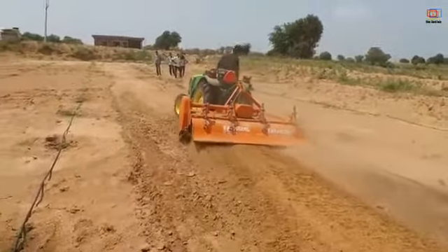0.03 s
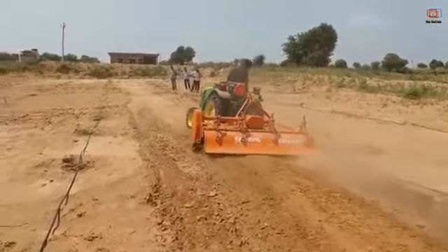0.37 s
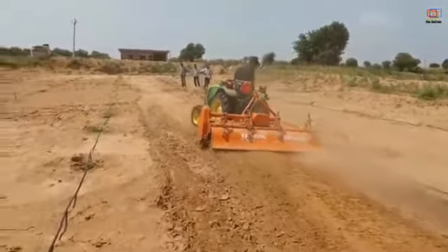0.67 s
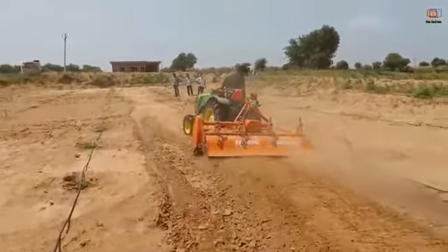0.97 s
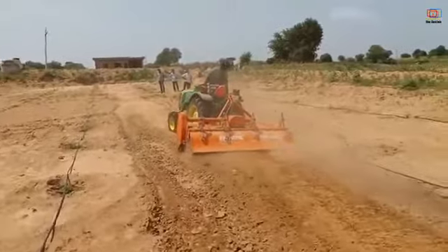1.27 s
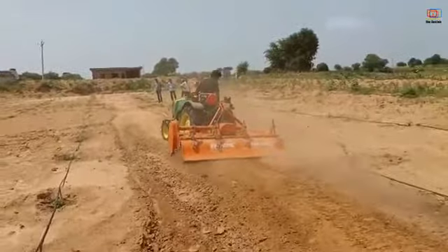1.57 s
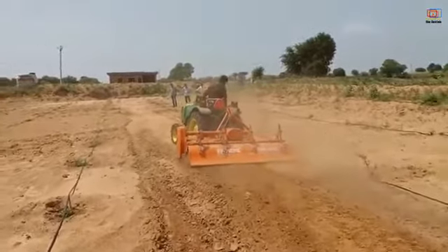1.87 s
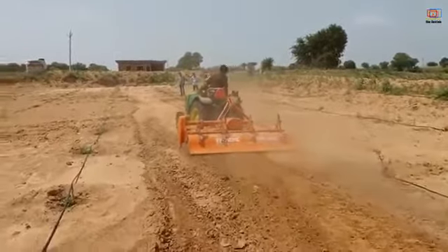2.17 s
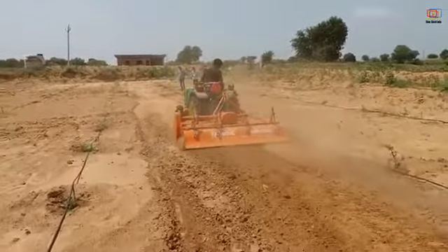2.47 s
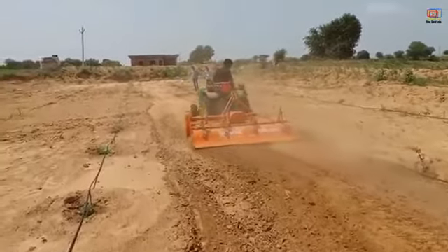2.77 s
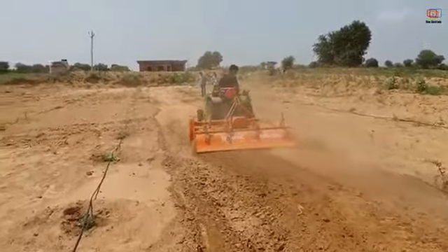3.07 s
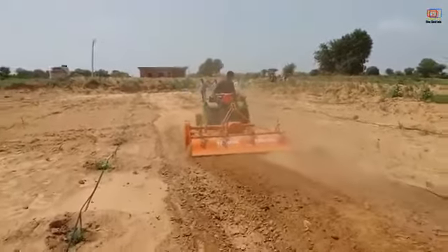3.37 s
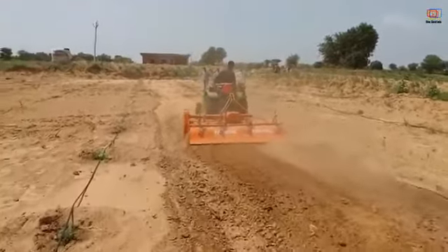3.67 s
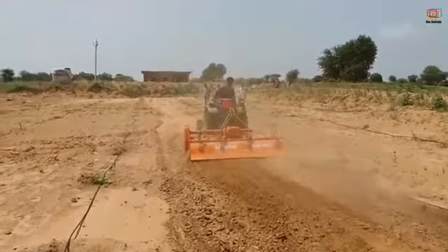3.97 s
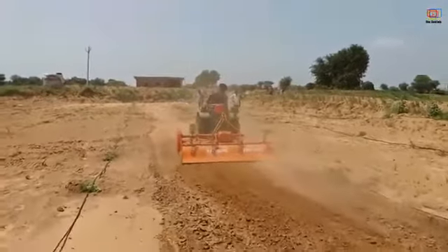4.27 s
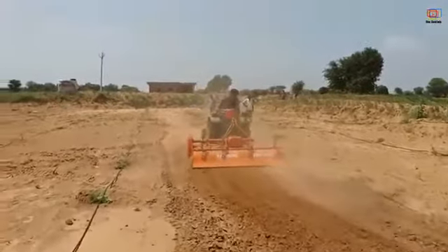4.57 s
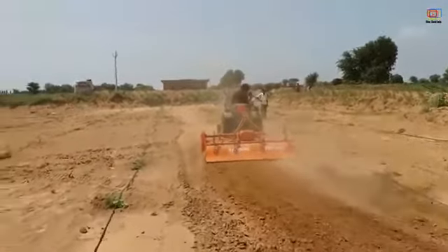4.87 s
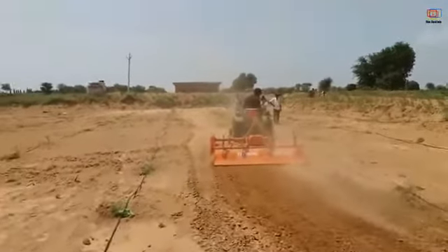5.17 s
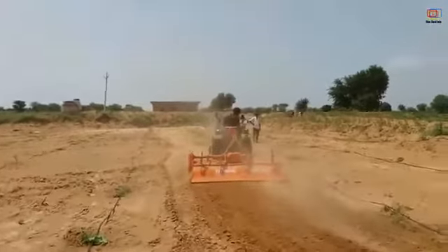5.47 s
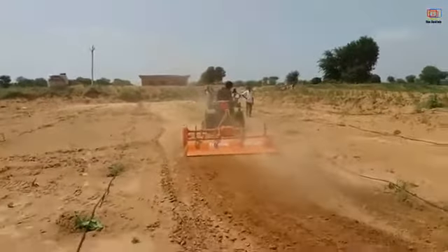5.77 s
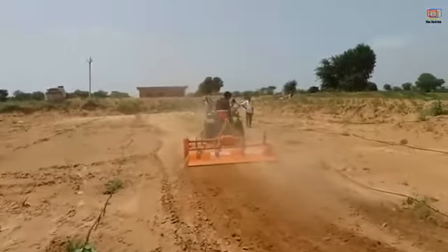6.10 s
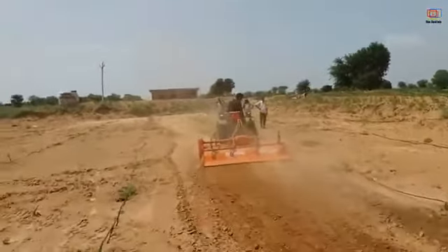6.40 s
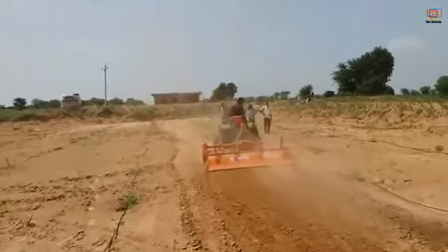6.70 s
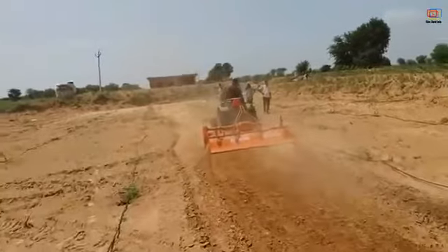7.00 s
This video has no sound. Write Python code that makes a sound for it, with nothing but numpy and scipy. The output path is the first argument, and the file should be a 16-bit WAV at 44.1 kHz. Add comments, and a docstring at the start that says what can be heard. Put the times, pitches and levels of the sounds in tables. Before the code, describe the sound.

Out in an open field, a small diesel tractor chugs evenly under load, its casings rattling and a loose metal cover clanking rapidly. The tiller behind it throws a gritty spray of dry earth, with a few small knocks from clods and stones. Two short grinding patches come early, the second with a harder growl and louder clanking. The hiss then softens as the machine moves slowly away, and light wind rumbles faintly on the stereo microphone.

```python
"""A small three-cylinder diesel tractor draws a rotary tiller away across a dry field, held near one
speed by its governor. The exhaust drones and gears whine; every firing knocks the block, rattles the
casings and rings a loose steel cover. The blades throw soil, sand and clods against the tiller's hood
and grind through two hard patches. It is heard in a light breeze, through two microphone ports a hand
apart. One engine cycle holds three firings; a tone's order is its multiple of the cycle rate."""
import sys
import numpy as np
from scipy import signal
from scipy.fft import rfft, irfft
from scipy.io import wavfile
from scipy.ndimage import uniform_filter1d

SR = 44100
rng = np.random.default_rng(int(sys.argv[2]) if len(sys.argv) > 2 else 0)


def store_wav(level_fs):
    """Save 16-bit WAV to argv[1]."""
    pcm = np.round(np.clip(np.atleast_2d(level_fs), -1, 1) * 32767)
    wavfile.write(sys.argv[1], SR, pcm.T.astype(np.int16))


N = 319284
TIME = np.arange(N) / SR
FREQ = np.fft.rfftfreq(N, 1 / SR)
FROM_MIDDLE_S = TIME - TIME.mean()
FIRST_FIRING = 0.05586  # place in the cycle, 0-1

# Engine speed. Each row: time in seconds, firings per second.
FIRING_RATE = [(0, 64.49), (0.8, 64.43), (1.35, 64.76), (2.0, 63.94), (2.4, 64.33), (2.8, 64.26),
               (3.2, 64.75), (3.7, 64.27), (4.7, 64.26), (5.4, 64.46), (6.5, 64.31), (7.24, 63.82)]
# The block's knock. Each row: time in seconds, relative level in dB.
KNOCK_LEVEL = [(0.05, -23), (0.32, -26), (0.58, -22), (1.72, -27.5), (2.56, -27), (3.03, -27),
               (5.53, -26.5), (7.1, -25.5)]
# The treble of valves and soil. Each row: time in seconds, relative level in dB.
TREBLE_LEVEL = [(0, -23.5), (0.7, -21), (1.1, -23.5), (2.0, -22), (2.75, -22.5), (3.1, -24.5),
                (3.85, -23.5), (4.95, -22.5), (5.3, -24), (7.24, -27)]


def undb(db):
    """Decibels to gain."""
    return 10 ** (np.asarray(db) / 20)


def unit(x):
    """Scale to rms 1."""
    return x / np.sqrt(np.mean(x ** 2))


def curves(table):
    """The columns of a timed table at every sample."""
    times, *columns = np.transpose(table)
    return [np.interp(TIME, times, column) for column in columns]


def response(points):
    """Gain at every frequency from (Hz, dB) points."""
    hz, db = np.transpose(points)
    return undb(np.interp(np.log(FREQ + 1), np.log(hz), db))


def colour(x, points):
    """EQ by (Hz, dB) points, rolling off beyond both ends; rms 1."""
    low_cut = 1 / (1 + (points[0][0] / (FREQ + 1)) ** 4)
    high_cut = 1 / (1 + (FREQ / points[-1][0]) ** 4) ** .5
    return unit(irfft(rfft(x) * response(points) * low_cut * high_cut, N))


def walk(rate):
    """Random drift: levels held 1 / rate seconds and smoothed twice; rms 1."""
    hold = int(SR / rate)
    held = np.repeat(rng.standard_normal(N // hold + 1), hold)
    return unit(uniform_filter1d(uniform_filter1d(held, hold), hold)[:N])


def spell(start, end, ramp_s):
    """A gate from 0 to 1 and back, with straight ramps centred on start and end."""
    return np.clip(np.minimum(TIME - start, end - TIME) / ramp_s + .5, 0, 1)


def driven(db, follow, fade_db_per_s):
    """A part's gain: it follows the load and fades as the tractor recedes (a negative fade swells)."""
    # How hard the load shakes the machine. Each row: time in seconds, relative level in dB.
    effort = [(0, -25), (0.17, -21.5), (0.32, -23.5), (0.5, -22.5), (0.9, -25.5), (1.08, -27.5),
              (1.65, -25.5), (2.05, -22), (2.35, -22.5), (2.6, -21.5), (3.0, -23), (3.7, -22.5),
              (4.15, -21.5), (4.4, -25), (4.61, -29), (4.75, -26), (4.95, -24), (5.3, -29), (6.28, -28.5),
              (6.4, -33), (6.52, -28), (7.24, -27.5)]
    above_usual_db = curves(effort)[0] + 23.5
    return undb(db + follow * above_usual_db - fade_db_per_s * FROM_MIDDLE_S)


def clearness():
    """A slowly rising gain that favours tones over clatter as the tractor recedes."""
    return undb((-3 + 0.66 * TIME) / 2)


def tones(cycle, table, waver_db, wander_rad, start_turns=lambda order: rng.random()):
    """Sines locked to the crank from (order, dB) rows, wavering in level and phase; 0 dB is rms 1."""
    out = 0
    for order, db in table:
        phase = 2 * np.pi * (order * cycle + start_turns(order)) + wander_rad * walk(5)
        out = out + np.sqrt(2) * np.sin(phase) * undb(db + waver_db * walk(5))
    return out


def blows(cycle, cylinder_db, decay, rise, steady):
    """Envelope of three evenly spaced firings over a steady churn; decay and rise are in cycles."""
    total = steady
    for k, db in enumerate(cylinder_db):
        age = (cycle - FIRST_FIRING - k / len(cylinder_db)) % 1
        total = total + undb(db) * np.exp(-age / decay) * (1 - np.exp(-age / rise))
    return total


def clatter(cycle, cylinder_db, repeat, decay, rise, steady, bite_db=1.5):
    """Metal clatter: a share of the contacts repeats every cycle, slowly shifting; the rest is new."""
    size, count = 2048, 3  # points in a cycle's contact pattern, patterns to crossfade
    turn = np.arange(size) / size
    weights = np.array([walk(1.188) for _ in range(count)])
    weights = weights / np.sqrt(np.sum(weights ** 2, axis=0))
    patterns = irfft(np.exp(2j * np.pi * rng.random((count, size // 2 + 1))))
    repeating = sum(w * np.interp(cycle % 1, turn, unit(p)) for w, p in zip(weights, patterns))
    share = np.clip(repeat + .05 * FROM_MIDDLE_S, 0, 1)  # more regular as the work settles
    contacts = np.sqrt(share) * repeating + np.sqrt(1 - share) * rng.standard_normal(N)
    load = undb(bite_db * walk(16))  # the blades bite unevenly
    return contacts * load * blows(cycle, cylinder_db, decay, rise, steady)


def exhaust(cycle):
    """The muffled pipe drones on the first three harmonics of the firing rate."""
    # Each row: time in seconds, then relative levels of harmonics one, two and three in dB.
    drone = [(0, -33, -34, -38), (0.8, -32.5, -33.5, -31), (1.5, -32.5, -36, -30), (2.0, -33.5, -47, -28.5),
             (2.5, -28.5, -49.1, -32.5), (3.3, -31, -46, -32.5), (4.2, -30, -41.5, -30),
             (5.5, -29, -36, -29.5), (7.24, -28.5, -34, -27.5)]
    harmonics = [(3 * (k + 1), db) for k, db in enumerate(curves(drone))]
    return tones(cycle, harmonics, waver_db=1.46, wander_rad=0.056) * undb(-0.8)


def engine(cycle):
    """Firings shake the chassis, knock the block and rattle the casings."""
    # EQ of each part, and of the casings' ring. Each row: frequency in Hz, gain in dB.
    chassis_eq = [(20, -17), (45, -9), (100, -10.5), (160, -2), (230, -2), (330, -0.5), (430, -4),
                  (540, -1), (700, -17)]
    block_eq = [(400, -30), (540, -2.5), (640, 1), (760, 3), (830, 1.5), (920, -2), (1200, -61)]
    casing_eq = [(700, 1.5), (900, -3), (1050, 0), (1200, -2), (1400, 1), (1650, -1), (1950, -0.5),
                 (2300, -1), (2900, -14.5)]
    ring_eq = [(700, -13), (840, 1), (930, -1), (1060, -19), (1500, -29)]
    shake = clatter(cycle, (0, 0, -2), repeat=0.28, decay=0.17, rise=0.044, steady=0.4)
    knock = clatter(cycle, (0, -2, -4), repeat=0.22, decay=0.14, rise=0.059, steady=0.32)
    contacts = clatter(cycle, (-2, 0, -4), repeat=0.6, decay=0.04, rise=0.055, steady=0.57)
    chassis = colour(shake, chassis_eq) * driven(db=-31.0, follow=0.29, fade_db_per_s=-0.33)
    block = colour(knock, block_eq) * undb(curves(KNOCK_LEVEL)[0] - 5.0)
    ring = colour(contacts, ring_eq) * driven(db=-15.5, follow=1.6, fade_db_per_s=0.6)
    casing = colour(contacts, casing_eq) * undb(3.5) + ring
    return (chassis + block) / clearness() + casing * driven(db=-29.0, follow=0.81, fade_db_per_s=0.54)


def gears(cycle):
    """Loaded gears and shafts whine at fixed ratios to the crank."""
    # The gear tones. Each row: order, relative level in dB.
    gear_tones = [(13.92, -1.5), (25.67, 1.7), (35.22, -1.5), (47.9, -9), (51.34, -7), (68.97, -4)]
    # Their shared fader. Each row: time in seconds, gain in dB.
    whine_level = [(0, -34.5), (0.42, -38), (1.2, -34.5), (1.5, -43.5), (2.2, -33.5), (2.6, -51),
                   (3.3, -38), (3.75, -31), (4.01, -33.5), (4.68, -32), (5.4, -36), (5.6, -33.5),
                   (7.24, -35.5)]
    return tones(cycle, gear_tones, waver_db=1.9, wander_rad=0.45) * undb(curves(whine_level)[0])


def chug_phase(order):
    """The phase in turns that the firings give a tone, so that neighbouring tones add up to a chug."""
    delay = 0.0902  # cycles after each firing
    pushes = sum(undb(db) * np.exp(-2j * np.pi * order * (FIRST_FIRING + delay + k / 3))
                 for k, db in enumerate((0, -1, -7)))
    return np.angle(pushes) / (2 * np.pi) + 0.12 * rng.standard_normal()


def hum(cycle):
    """Chassis, block, cover and frame sing with the crank; a growl swells as the engine labours."""
    # The tones of each part. Each row: order, relative level in dB.
    chassis_tones = [(7, -13), (8, -17), (11, -18), (12, -9.5), (13, -14), (25, -16)]
    block_tones = [(29, -16), (30, -12), (31, -15), (32, -11.5), (33, -17), (34, -14), (35, -12.5),
                   (36, -14.5), (37, -12), (38, -11)]
    cover_tones = [(63, -6), (68, -10), (70, -7), (72, -4), (75, -7), (78, 0), (81, -7)]
    frame_tones = [(16, -18), (17, -12), (18, -15), (19, -16), (20, -20)]
    # Faders for cover and frame. Each row: time in seconds, gain in dB.
    cover_level = [(0, -31.5), (1.3, -32.5), (1.8, -37), (3.3, -39), (4.5, -39), (5.7, -38.5), (7.24, -41)]
    frame_level = [(0, -39), (0.6, -27), (5.3, -32), (6.0, -38.5), (7.24, -38)]
    labour = spell(1.7, 3.16, ramp_s=0.99)  # a stretch of harder soil
    growl_db = -3.5 + 6.5 * labour - 2.5 * TIME
    chassis = tones(cycle, chassis_tones, waver_db=1.5, wander_rad=0.35) * undb(-4.0) * clearness()
    growl = tones(cycle, [(15, growl_db)], waver_db=2.2, wander_rad=.6)  # fifth firing harmonic
    block = tones(cycle, block_tones, waver_db=2.5, wander_rad=0.31, start_turns=chug_phase)
    block *= undb(curves(KNOCK_LEVEL)[0] - 1.1) * clearness()
    cover = tones(cycle, cover_tones, waver_db=2.0, wander_rad=0.51) * undb(curves(cover_level)[0])
    frame = tones(cycle, frame_tones, waver_db=1.5, wander_rad=0.46) * undb(curves(frame_level)[0])
    return (chassis + growl) * driven(db=-30.0, follow=0.39, fade_db_per_s=-1.45) + frame + block + cover


def valves(cycle):
    """Injectors and valves tick brightly at every firing."""
    # EQ of the ticks. Each row: frequency in Hz, gain in dB.
    tick_eq = [(1400, -2), (2000, 3.5), (2500, -3), (2950, 8.5), (3600, 5.5), (4300, 0), (4900, 2.5),
               (5500, -9), (6000, 1), (7000, -28), (8000, -30), (14000, -48)]
    early = cycle + 0.02505
    ticks = clatter(early, (0, -2.5, -.5), repeat=0.24, decay=0.053, rise=0.06, steady=0.44, bite_db=1.4)
    return colour(ticks, tick_eq) * undb(curves(TREBLE_LEVEL)[0] - 1.42)


def soil(cycle):
    """Dry crumbs spray against the shaking hood: dense, uneven clicks in a hiss of dust."""
    # EQ of the spray. Each row: frequency in Hz, gain in dB.
    spray_eq = [(500, 15.5), (3000, 2.5), (6500, 2.5), (8000, 1), (9500, 0.5), (11200, 1), (12600, -6.5),
                (13400, -7.5), (14800, -36)]
    crumbs = rng.standard_normal(N) * (rng.random(N) < 3000 / SR)  # about 3000 a second
    dust = 2.4 * rng.standard_normal(N)
    spray = (unit(crumbs) + dust) * blows(cycle, (0, 0, 0), decay=0.063, rise=0.059, steady=0.72)
    flicker = undb(1.3 * walk(25.09))
    fade_db = 0.89 * FROM_MIDDLE_S  # the tiller recedes
    return colour(spray * flicker, spray_eq) * undb(curves(TREBLE_LEVEL)[0] - 7.5 - fade_db)


def sand(cycle):
    """Sand hisses off the hood in surges."""
    # EQ of the hiss. Each row: frequency in Hz, gain in dB.
    hiss_eq = [(5000, -35), (5900, 0.5), (6600, 6), (7200, 0), (7700, -17)]
    # Its fader. Each row: time in seconds, gain in dB.
    hiss_level = [(0, -41), (0.3, -41), (0.52, -31.5), (0.72, -33), (0.93, -31.5), (1.12, -38), (1.33, -35),
                  (1.5, -39), (2.44, -38), (2.72, -30), (3.04, -36), (5.0, -38.5), (5.7, -38.5),
                  (7.24, -46.5)]
    spray = rng.standard_normal(N) * blows(cycle, (0, -1, 0), decay=0.086, rise=0.046, steady=0.29)
    surges = undb(1.6 * walk(28))
    return colour(spray * surges, hiss_eq) * undb(curves(hiss_level)[0])


def wind():
    """A light breeze rumbles on each port by itself."""
    # EQ of the rumble. Each row: frequency in Hz, gain in dB.
    breeze_eq = [(25, -4), (60, 12), (120, -6), (400, -38)]
    return np.array([colour(rng.standard_normal(N), breeze_eq) * undb(-47.5 + 1.7 * walk(2.6))
                     for _ in range(2)])


def struck_plate(cycle, delay, ring_hz, modes, uneven_db):
    """Ring and contact force of a plate hit once a cycle, delay cycles after the first firing."""
    scatter_hz, contact_s = 17.5, 0.0035
    position = cycle - FIRST_FIRING - delay + 1
    stroke = position.astype(int)
    age = position % 1 * 3 / curves(FIRING_RATE)[0]  # seconds since the hit
    # Every hit has its own strength, pitch and mix of modes.
    strength, pitch = rng.standard_normal((stroke[-1] + 1, 2))[stroke].T
    ring = 0
    for ratio, db, swell_s, loose in modes:
        mix, slip = rng.standard_normal((stroke[-1] + 1, 2))[stroke].T
        swell = age / swell_s
        phase = 2 * np.pi * (ratio * ring_hz + scatter_hz * pitch) * age + loose * slip
        ring = ring + undb(db + 2.0 * loose * mix) * swell * np.exp(1 - swell) * np.sin(phase)
    return np.array([ring, np.exp(-age / contact_s)]) * undb(uneven_db * strength)


def loose_cover(cycle):
    """Each firing cracks against a loose steel cover and rings it; the first cylinder leads the clank."""
    # The first cylinder's clank. Each row: time in seconds, relative level in dB, delay in cycles.
    clank = [(0, -29, 0.016), (0.38, -27, 0.008), (0.55, -17.5, 0), (0.75, -24, 0.025), (1.5, -20, 0.037),
             (2.0, -17.5, 0.011), (2.35, -21, 0.0022), (2.63, -15, 0.0078), (2.9, -20.5, -0.038),
             (3.2, -18.5, -0.048), (3.55, -26, -0.06), (4.15, -25, -0.075), (4.45, -22, 0.024),
             (5.7, -21.5, 0.06), (7.24, -20, 0.06)]
    # Spells when the third hits harder. Each row: start and end in seconds, boost in dB.
    third_clanks = [(0, 1.0, 3), (1.75, 2.7, 3), (3.452, 4.2, 9)]
    # The ring, which rises as the engine labours. Each row: time in seconds, pitch in Hz.
    ring_pitch = [(0, 1684), (1.5, 1667), (2.3, 1720), (2.7, 1690), (3.3, 1626), (7.24, 1618)]
    # Each row: ratio to that pitch, relative level in dB, attack in seconds, phase scatter in radians.
    modes = [(1, 0, 0.0026, 0.3), (1.01, -15.5, 0.0076, 0.3), (1.12, -8.5, 0.0025, 0.74),
             (0.87, -14, 0.00073, 1.2)]
    # EQ of the crack. Each row: frequency in Hz, gain in dB.
    crack_eq = [(1100, -4), (1800, 1), (2500, -8), (3400, 1), (4600, -10)]
    usual_db = -30.5  # second and third cylinders
    first_db, first_delay = curves(clank)
    third_db = usual_db + sum(db * spell(start, end, ramp_s=0.13) for start, end, db in third_clanks)
    cylinders = [(first_db, first_delay), (usual_db, 0.325), (third_db, 0.655)]
    ring, force = sum(struck_plate(cycle, delay, curves(ring_pitch)[0], modes, uneven_db=1.1) * undb(db)
                      for db, delay in cylinders)
    crack = colour(rng.standard_normal(N), crack_eq) * force * undb(-4.5)
    return (ring + crack) * driven(db=2.0, follow=0.87, fade_db_per_s=0.45)


def side_panel(cycle):
    """The second cylinder knocks a duller panel."""
    # Each row: ratio to the ring's pitch, relative level in dB, attack in seconds, phase scatter in radians.
    modes = [(0.97, -1, 0.0015, 0.48), (0.846, -5.5, 0.0019, 0.79)]
    # The panel's fader. Each row: time in seconds, gain in dB.
    panel_level = [(0, -34), (1.5, -26), (1.95, -18), (2.8, -21), (3.3, -26), (4.7, -25.5), (5.8, -27),
                   (6.3, -30), (7.24, -29)]
    ring, _ = struck_plate(cycle, delay=0.35, ring_hz=1294, modes=modes, uneven_db=1.4)
    return ring * undb(curves(panel_level)[0])


def strikes():
    """Thrown clods thud on the hood, small stones tick, and twice the loose cover gives a sharp extra clank: a
    brief, rough ring each."""
    # Each row: start in seconds, pitch in Hz, level in dB.
    hits = [(0.049, 740, -15), (0.077, 760, -16), (0.095, 740, -15), (0.191, 890, -12), (0.544, 760, -16),
            (2.476, 850, -13), (2.721, 6600, -22), (3.571, 1650, -17), (3.803, 3650, -13),
            (4.118, 746, -14.5), (4.239, 750, -16), (4.505, 3630, -14), (4.737, 3700, -14),
            (5.737, 1630, -14), (7.088, 755, -17)]
    out = np.zeros(N)
    for start, hz, db in hits:
        ringing = (TIME > start) & (TIME < start + .03)
        age = TIME[ringing] - start
        attack_s = 0.0016 * np.sqrt(1000 / hz)  # higher rings are shorter
        swell = age / attack_s
        turns = rng.random(2)
        ring = np.sin(2 * np.pi * (hz * age + turns[0]))
        ring += 0.19 * np.sin(2 * np.pi * (1.17 * hz * age + turns[1]))
        out[ringing] += undb(db) * swell * np.exp(1 - swell) * ring
    return out


def grind(cycle):
    """The tiller's hood groans while the blades grind through a hard patch."""
    # EQ of the groan. Each row: frequency in Hz, gain in dB.
    groan_eq = [(450, -12), (690, -10), (800, 1), (920, -1), (1080, -7), (1300, -6), (1500, -17)]
    # Each row: start and end in seconds, level in dB.
    hard_patches = [(0.452, 0.696, -31), (2.415, 2.92, -27.5)]
    scrape = clatter(cycle, (0, 0, 0), repeat=0.35, decay=0.14, rise=0.057, steady=0.44)
    gate = sum(undb(db) * spell(start, end, ramp_s=0.071) for start, end, db in hard_patches)
    return colour(scrape, groan_eq) * gate


def ports(direct, scattered):
    """Both ports hear the bass alike; the treble, largely scattered by the ground, varies in width."""
    # Stereo width. Each row: frequency in Hz, side over mid in dB.
    width = [(200, -19), (350, -15), (500, -8), (620, -13), (780, -31), (1400, -33), (1560, -15),
             (1800, -11), (2050, -3), (2350, 0), (2540, 7), (2680, 28), (2800, 14), (2920, 7), (3200, 0),
             (3550, -2), (4000, -9), (4400, -5), (5000, 7), (5170, 18), (5500, 33), (5800, 11), (6250, 0),
             (6900, -9), (7500, -1), (8150, 3), (8450, -18), (9500, -9), (10150, 6), (10700, 0),
             (11500, -4), (12800, 5), (14000, -1)]
    # The direct sound's lean to the left. Each row: frequency in Hz, share louder, share earlier.
    left_lean = [(60, -.2, 0), (200, -.05, .1), (480, -.42, .55), (800, -.3, 0), (2350, -.37, 0),
                 (3050, .33, .42), (3550, .13, .56), (4300, -.25, 0), (4900, -.35, -.25), (5500, -.03, 0),
                 (6550, -.47, .27), (7300, -.2, -.12), (8700, -.1, 0), (11000, -.45, .24), (12000, -.5, 0)]
    spread = response(width)
    hz, louder, earlier = np.transpose(left_lean)
    lean = np.interp(FREQ, hz, louder + 1j * earlier)
    mid = rfft(direct) / np.sqrt(1 + spread ** 2)
    diffuse = np.sqrt((1 - np.abs(lean) ** 2) / (1 + spread ** 2)) * rfft(scattered)
    side = spread * (lean * mid - diffuse)
    soft_ends = signal.windows.tukey(N, .001)
    return irfft(np.array([mid + side, mid - side]), N) * soft_ends


def scene():
    """One crankshaft times the machine. Scattered clatter keeps the beat but has its own grain."""
    cycle = 0.03098 + np.cumsum(curves(FIRING_RATE)[0]) / SR / 3  # crank position in cycles
    direct, scattered = (engine(cycle) + valves(cycle) + soil(cycle) + sand(cycle) for _ in range(2))
    direct += exhaust(cycle) + gears(cycle) + hum(cycle)
    direct += loose_cover(cycle) + side_panel(cycle) + grind(cycle) + strikes()
    return ports(direct, scattered) + wind()


def record(dry):
    """A steep low-pass takes off the top above 14.8 kHz."""
    return signal.sosfilt(signal.ellip(10, .2, 90, 14800, fs=SR, output="sos"), dry)


dry = scene()
out = record(dry)
store_wav(out)
```